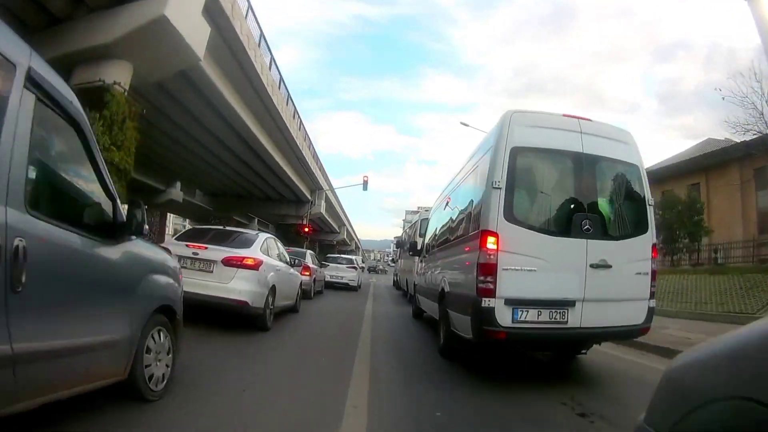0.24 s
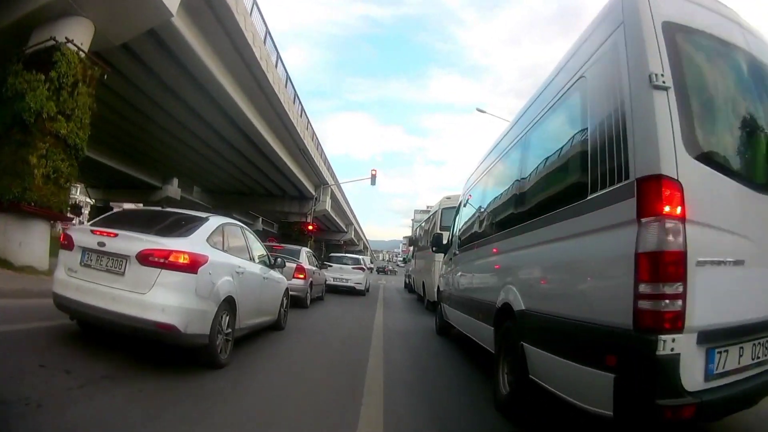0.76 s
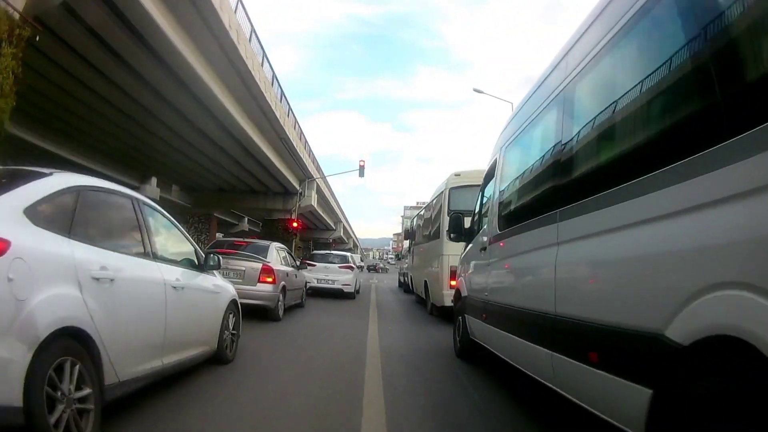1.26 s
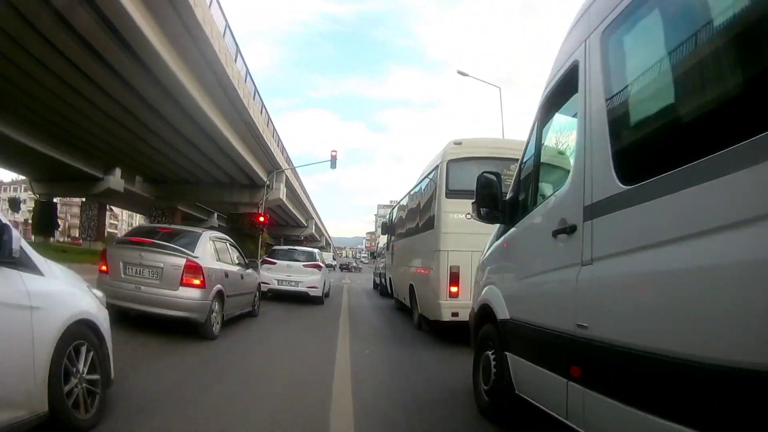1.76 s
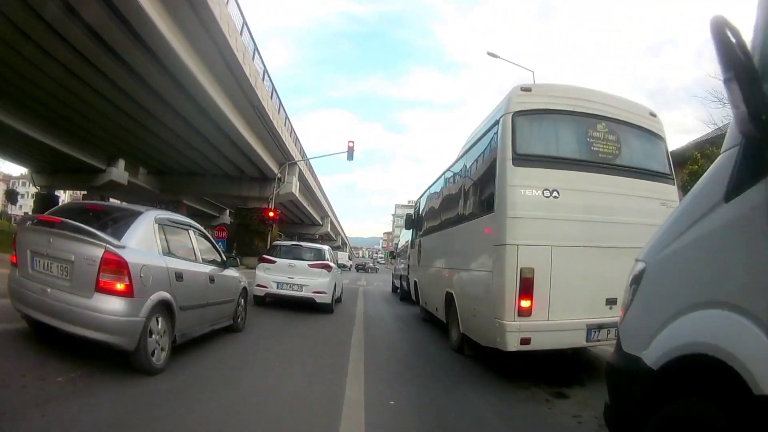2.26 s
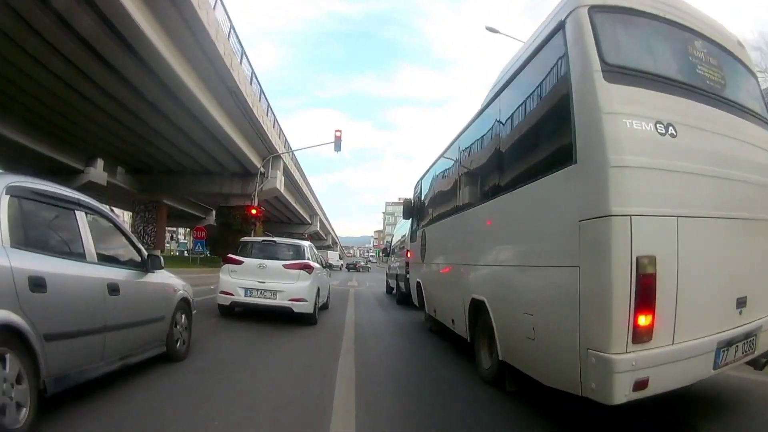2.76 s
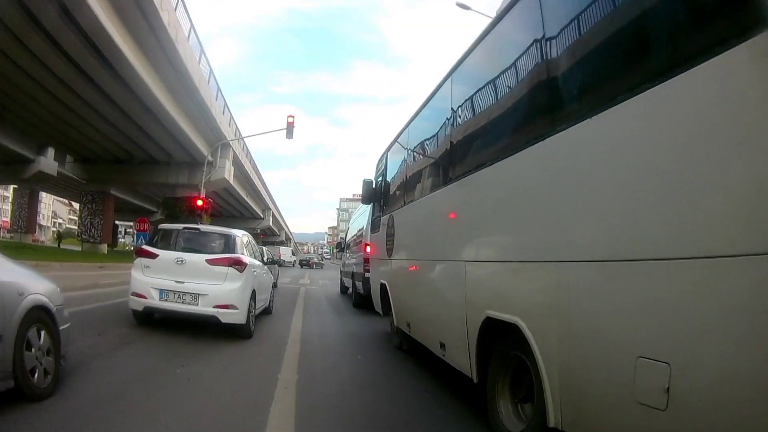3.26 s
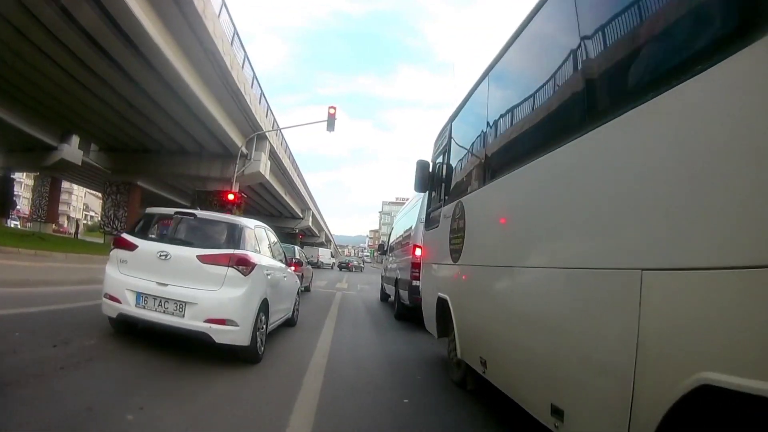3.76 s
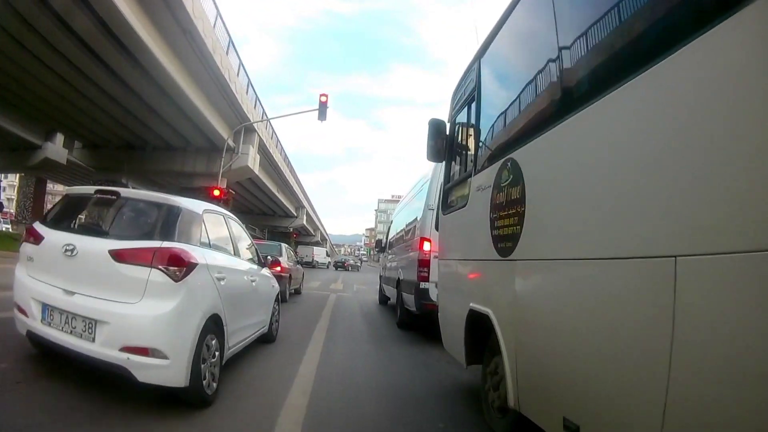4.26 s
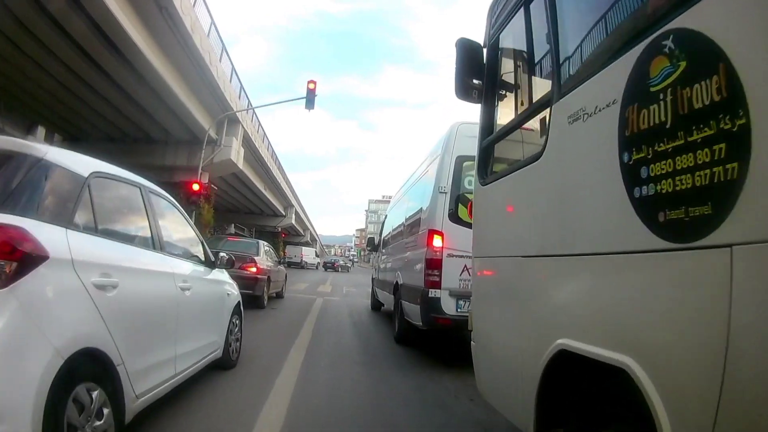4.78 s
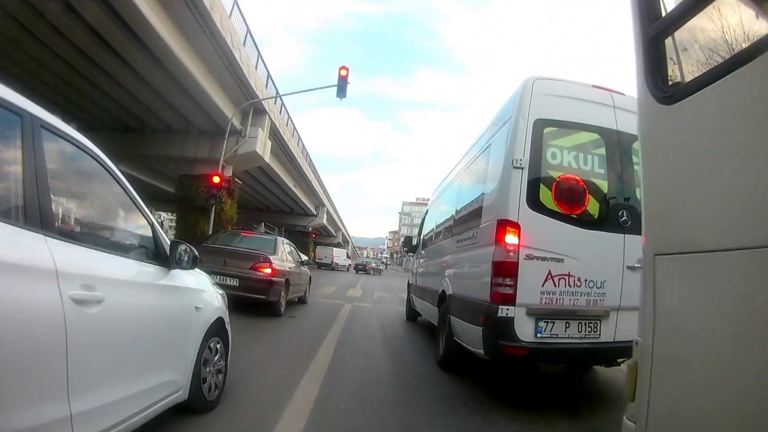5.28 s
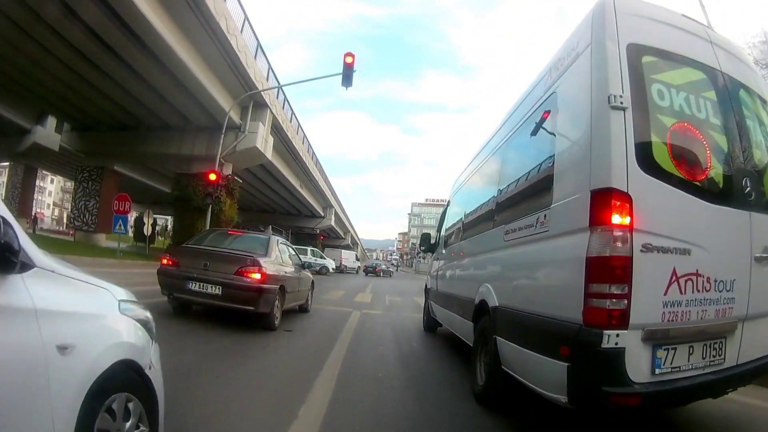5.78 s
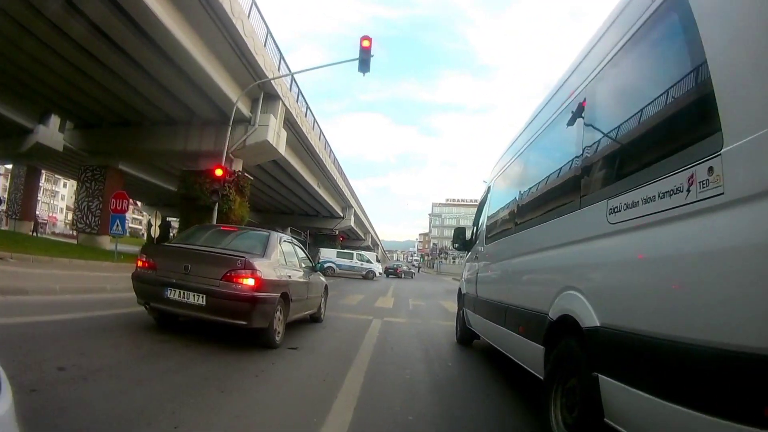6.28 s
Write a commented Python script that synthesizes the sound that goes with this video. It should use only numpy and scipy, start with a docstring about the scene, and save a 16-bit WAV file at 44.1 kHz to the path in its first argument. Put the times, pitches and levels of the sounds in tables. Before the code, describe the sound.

A cased camera microphone on a bicycle hears mostly vibration: a steady tyre hum falling by about an octave, road grain droning and the frame booming. One sharp plastic clack dominates the first second, then brief hoarse brake rubs dip the hum, followed by a dull thump and scattered small ticks. Outdoors around it, idling traffic roars dully and fades as the ride slows.

```python
"""The tyre tread of a bicycle hums lower as the bicycle slows between two queues of idling cars and vans.
It is heard from a cased camera on the handlebar: the hum is a tone at the rate of the tread blocks, and
road grain drones through the resonances of the mount and handlebar. Blows make the case knock, rattle
and tick by ringing its modes; the brake pads rub in short swells of resonant noise. Behind them are
shaped noises: air round the case, the growl of close cars, and a dull roar of traffic with diesel clatter."""
import sys
import numpy as np
from scipy import signal
from scipy.fft import rfft, irfft, next_fast_len
from scipy.io import wavfile
from scipy.ndimage import uniform_filter1d

SR = 44100
rng = np.random.default_rng(int(sys.argv[2]) if len(sys.argv) > 2 else 0)


def generate_wav(sig):
    """Save sig (samples, or channels by samples) to the path in sys.argv[1] as 16-bit PCM at SR."""
    pcm = np.round(np.clip(np.atleast_2d(sig).T, -1, 1) * 32767).astype(np.int16)
    wavfile.write(sys.argv[1], SR, pcm)


N = 287973
HIT_SIZE = 4096  # length of one blow [samples]

# tread blocks meeting the road, in step with the speed: (time [s], block rate [Hz])
TREAD_RATE = [(0, 131.5), (.9, 127.1), (1.35, 123.5), (1.8, 117.5), (2.35, 108.1), (2.72, 97.43),
              (3.13, 92.34), (3.6, 81.34), (4.0, 76.53), (4.45, 73), (5.6, 69.7), (6.53, 64.2)]


def undb(db):
    """Amplitude ratio of a level in decibels."""
    return 10 ** (np.asarray(db) / 20)


def curve(table):
    """Linear interpolation in time of rows (time [s], value)."""
    rows = np.array(table)
    return np.interp(np.arange(N) / SR, rows[:, 0], rows[:, 1])


def swells(table):
    """Sum of Gaussian pulses (middle [s], length [s], height); height times length is the area of each."""
    t = np.arange(N) / SR
    return sum(height * np.exp(-np.pi * ((t - s) / length_s) ** 2) for s, length_s, height in table)


def unit(x):
    """Normalise the mean power to 1."""
    return x / np.sqrt(np.mean(x ** 2))


def peak(x, db):
    """Normalise the largest excursion to a peak level [dB]."""
    return x * undb(db) / np.abs(x).max()


def steady(x, window_s):
    """Gain control: division by the running rms evens out slow swells and leaves quick flutter."""
    return x / np.sqrt(uniform_filter1d(x * x, int(window_s * SR)) + 1e-18)


def walk(rate):
    """Low-pass random modulation: steps drawn about rate times a second, smoothed twice, rms 1."""
    k = int(SR / rate)
    steps = rng.standard_normal(N)[np.arange(N) // k]
    smoother = uniform_filter1d(steps, k, mode="constant")
    return unit(uniform_filter1d(smoother, k, mode="constant"))


def turns(hz):
    """Phase [rad] as the time integral of a moving frequency."""
    return 2 * np.pi * np.cumsum(hz) / SR


def wavering(phase, rate, spread):
    """Random quadrature modulation: spread 0 is a pure tone, 1 a narrow band of noise."""
    noise = walk(rate) * np.sin(phase) + walk(rate) * np.cos(phase)
    return unit((1 - spread) * np.sin(phase) + spread * noise)


def ring(x, modes, order=1):
    """Parallel resonators (centre [Hz], width [Hz], gain [dB]); order 2 steepens their skirts."""
    f = np.fft.rfftfreq(len(x), 1 / SR) + 1e-6  # keeps clear of division by zero
    response = 0
    for hz, width, db in modes:
        detuning = (f * f - hz * hz) / (f * width)
        response = response + undb(db) / (1 + 1j * detuning) ** order
    return irfft(rfft(x) * response, len(x))


def shaken(modes):
    """Random vibration: each resonance is kept ringing by its own white noise; the sum has rms 1."""
    size = next_fast_len(N, real=True)
    return unit(sum(ring(rng.standard_normal(size), [mode], order=2) for mode in modes)[:N])


def band(x, lo_hz, hi_hz, order=2):
    """Butterworth band-pass filter."""
    return signal.sosfilt(signal.butter(order, [lo_hz, hi_hz], "band", fs=SR, output="sos"), x)


def colour(x, points):
    """Spectral shaping by (frequency [Hz], gain [dB]) points, joined on a logarithmic frequency axis."""
    hz, db = np.transpose(points)
    f = np.fft.rfftfreq(len(x), 1 / SR) + 1
    return irfft(rfft(x) * undb(np.interp(np.log(f), np.log(hz), db)), len(x))


def tyre(phase):
    """Periodic impact: tread blocks hum at their rate, slap more separately when slow, and dip at brake rubs."""
    # hum level before wavering and braking: (time [s], level [dB])
    hum_level = [(0, -45.5), (.55, -47), (.95, -53), (1.08, -40.5), (1.75, -46), (2.05, -47), (2.45, -42),
                 (3.6, -48), (4.3, -45), (5.55, -49.5), (6.53, -47)]
    tone = np.sin(phase) * (1 + 0.12 * walk(23))
    # the octave gains 4 dB each time the block rate halves
    octave_db = -16.5 - 4 * np.log2(curve(TREAD_RATE) / 75)
    octave = undb(octave_db) * (1 + 0.25 * walk(16)) * np.sin(2 * phase + .3 * walk(20))
    rub = rubbing()
    duck = 1 - 0.87 * rub / rub.max()  # the hardest rub takes 87 % of the hum
    waver_db = 1.7 * walk(11)
    return unit(tone + octave) * duck * undb(curve(hum_level) + waver_db)


def shaking_db():
    """Forced vibration: level [dB] of the shaking by asphalt grain, raised in short swells."""
    # shaking by the grain of the asphalt: (time [s], level [dB])
    grain_level = [(0.0, -41), (1.54, -36), (1.78, -34), (2.11, -36.5), (2.78, -42), (3.71, -45.5),
                   (4.71, -47.5), (5.31, -45), (6.53, -46.5)]
    # short swells of the drone, from coarse asphalt or ringing on after a knock:
    # (middle [s], length [s], extra shaking [dB])
    drone_swells = [(.49, 0.08, 3.5), (.68, .09, 5.5), (.75, .05, 3.5), (1.94, 0.083, 6.5),
                    (2.07, 0.033, 4.5), (2.21, .14, 5), (2.44, 0.062, 6.5), (3.43, .12, 6.5),
                    (3.8, 0.13, 4.5), (4.07, 0.11, 6.5), (4.35, 0.082, 7), (5.11, .1, 3), (5.29, 0.03, 6.5),
                    (5.89, 0.032, 8)]
    return curve(grain_level) + swells(drone_swells)


def road(phase):
    """Resonance: grain rings the mount, joined by the tread's third harmonic as it slides through."""
    # resonances of the mount: (centre [Hz], width [Hz], gain [dB])
    mount_modes = [(327.4, 26, -1), (344.7, 26, 2.5), (388.5, 52, -7.5), (435.2, 49, -14.5)]
    # where the third harmonic rings the mount: (centre [Hz], width [Hz], level over the grain [dB])
    third_modes = [(333.5, 38, 1.5), (388, 22, -4)]
    grain = shaken(mount_modes)
    third_hz = 3 * curve(TREAD_RATE)
    nearness = sum(undb(db) * np.exp(-((third_hz - hz) / width) ** 2) for hz, width, db in third_modes)
    third = nearness * wavering(3 * phase, rate=44, spread=.68)
    return steady(grain + third, window_s=.09) * undb(shaking_db() + 0.68)


def frame(phase):
    """Resonance: tread overtones and grain boom in the handlebar; the frame bounces on the air in the tyres."""
    # tread overtones that boom: (multiple of the block rate [1], level at resonance [dB])
    overtones = [(1.679, -44), (2.0, -47), (3.0, -49.5), (3.3, -51)]
    # bounce of the frame, before a trim of -0.94 dB: (time [s], level [dB])
    bounce_level = [(0, -53), (.9, -46.5), (1.25, -42.5), (2.5, -40.5), (2.95, -46.5), (3.7, -43),
                    (4.9, -50.5), (6.05, -52), (6.3, -45), (6.53, -51)]
    boom_hz, boom_width_hz = 237, 24
    block_hz = curve(TREAD_RATE)
    grain_db = shaking_db() - 14.5  # the handlebar's share of the road grain
    boom = shaken([(boom_hz, boom_width_hz, 0)]) * undb(grain_db)
    for multiple, db in overtones:
        nearness = np.exp(-((multiple * block_hz - boom_hz) / boom_width_hz) ** 2)
        tone = steady(wavering(multiple * phase, rate=30, spread=.58), window_s=.15)
        boom = boom + undb(db) * nearness * tone
    bounce = steady(shaken([(42, 11, 0)]), window_s=.17)
    return boom + bounce * undb(curve(bounce_level) - 0.94)


def rubbing():
    """Contact strength: the amplitude of friction swells each time the brake pads touch the wheel."""
    # touches of the brake pads: (middle [s], length [s], level [dB])
    pad_touches = [(1.973, 0.28, -55), (2.255, 0.082, -49.5), (2.462, 0.077, -50.5), (2.657, 0.2, -56.5),
                   (2.941, 0.15, -58.5), (3.2, 0.11, -53), (3.682, 0.15, -57.5), (5.784, 0.1, -64)]
    return swells([(s, length_s, undb(db)) for s, length_s, db in pad_touches])


def brake():
    """Friction noise: random scraping excites the resonances of the brake, with a quick flutter."""
    # resonances of the rubbing brake: (centre [Hz], width [Hz], gain [dB])
    pad_modes = [(1064, 260, 7), (1750, 320, -13), (2160, 170, -15.5), (3015, 700, -16.5),
                 (3660, 100, -17.5), (4306, 89, -21.5)]
    flutter_db = 2.65 * walk(120)
    return shaken(pad_modes) * rubbing() * undb(flutter_db)


def contact(chatter_s):
    """Impulsive excitation: a push, then exponentially decaying chatter between the touching parts."""
    t = np.arange(HIT_SIZE) / SR
    push = 0.79 * rng.standard_normal(HIT_SIZE) * np.exp(-t / chatter_s)
    push[0] += 1
    return push


def blow(chatter_s, treble_db, thud_db, top_hz):
    """Modal response: a softer contact loses treble, a heavier one reaches the low modes of the case."""
    # modes of the camera case: (centre [Hz], width [Hz], level [dB])
    case_modes = [(440, 120, -9), (740, 250, -5), (1150, 260, -2.5), (1475, 190, -0.5), (1840, 270, -2.5),
                  (2195, 250, -4), (2760, 290, -12), (3098, 280, -9.5), (3630, 300, -13.5),
                  (4450, 190, -13), (5650, 1200, -14.5), (7150, 580, -25.5)]
    sound = 0
    for hz, width, db in case_modes:
        treble = treble_db * max(np.log2(hz / 1500), 0)  # dB per octave above 1500 Hz
        thud = thud_db * max(np.log(1150 / hz), 0)  # dB per factor e below 1150 Hz
        mode = unit(ring(contact(chatter_s), [(hz, width, 0)], order=2))
        sound = sound + undb(db + treble + thud) * mode
    return signal.sosfilt(signal.butter(7, top_hz, fs=SR, output="sos"), sound)


def add(out, s, x):
    """Superposition: mix x into out at time s [s]."""
    i = int(s * SR)
    out[i:i + len(x)] += x[:N - i]


def knocks():
    """Impact: hard clacks are brighter, bumps dull, ticks thin; jolts add a damped thump of the mount."""
    # clacks of the case in its mount:
    # (time [s], peak [dB], treble slope [dB per octave], chatter decay [s])
    clacks = [(0.6643, -19, -15.5, 0.0039), (0.6769, -12.5, -9, 0.0017), (0.6912, -18.5, -5, 0.0034),
              (0.7281, -3.5, 2.26, 0.0011), (0.742, -31, -5.5, 0.0033), (0.8043, -32, -7.5, 0.0014),
              (0.8242, -22.5, -8, 0.0011), (0.8605, -20.5, -5, 0.0018), (0.8949, -29.5, -6.5, 0.0013),
              (1.4485, -37, -12, 0.0016), (3.773, -43.5, -12, 0.0015), (3.987, -43, -23, 0.0013),
              (4.0123, -30.5, -26, 0.0031), (4.0396, -21.5, -19.5, 0.002)]
    # knocks from bumps in the road: (time [s], peak [dB], thud slope [dB per factor e in frequency])
    bump_knocks = [(0.3285, -30.5, 8), (0.3373, -32.5, 8), (0.955, -37, 17), (0.9998, -41, 3),
                   (1.0205, -30.5, 14.5), (1.3759, -28, 22), (1.7614, -27, 14.5), (4.0365, -22, 6),
                   (4.0544, -47.5, 10), (4.0913, -35, 10.5), (4.7052, -34, 12), (4.7197, -37.5, 4.5),
                   (5.0364, -44, 5), (5.3094, -42, 0.5), (5.8515, -56, 11), (6.4522, -36.5, 14.5),
                   (6.4725, -33.5, 4)]
    # the front wheel drops over a seam: (time [s], peak [dB])
    seam_jolts = [(0.664, -34.5), (4.0401, -18.5)]
    # light ticks of the running gear: (time [s], peak [dB])
    gear_ticks = [(1.822, -49.5), (3.0092, -58.5), (3.1108, -61.5), (4.133, -50.5), (4.348, -56),
                  (4.5344, -53), (4.88, -62.5), (5.09, -54), (5.7612, -54.5), (6.0668, -56.5)]
    out, t = np.zeros(N), np.arange(HIT_SIZE) / SR
    for s, db, treble_db, chatter_s in clacks:
        clack = blow(chatter_s, treble_db, thud_db=-7.5, top_hz=7800)
        add(out, s, peak(clack, db))
    for s, db, thud_db in bump_knocks:
        knock = blow(chatter_s=0.0046, treble_db=-26, thud_db=thud_db, top_hz=4080)
        add(out, s, peak(knock, db))
    for s, db in seam_jolts:
        envelope = (1 - np.exp(-t / 0.00067)) * np.exp(-t / 0.0036)
        add(out, s, peak(np.sin(2 * np.pi * 440 * t) * envelope, db))
    for s, db in gear_ticks:
        tick = blow(chatter_s=0.0061, treble_db=-0.5, thud_db=-2.5, top_hz=5270)
        add(out, s, peak(band(tick, 1600, 8000, order=3), db))
    return out


def wind():
    """Flow noise: air rushes round the case with an amplitude in proportion to the speed."""
    # colour of the air streaming past the case: (frequency [Hz], density [dB per Hz])
    rush_colour = [(20, -7.5), (60, -4.5), (100, 0.5), (160, 0.5), (210, 4.5), (285, 3), (400, 0.5),
                   (480, 0), (560, -14.5), (900, -34), (3000, -76.5)]
    speed_db = 20 * np.log10(curve(TREAD_RATE) / 100)
    gust_db = 1.3 * walk(9)
    rush = unit(colour(rng.standard_normal(N), rush_colour))
    return rush * undb(-49.5 + speed_db + gust_db)


def near_cars():
    """Inverse-square law: fans and engines growl through the wheel arches of close cars, fading with distance."""
    # vehicles passed at arm's length: (time abreast [s], level abreast [dB])
    passes = [(.22, -53), (.85, -48.5), (1.7, -54), (2.05, -58.5), (3.45, -62.5), (6.45, -63.5)]
    pass_s = 0.14  # time to ride as far as the gap to those cars
    t = np.arange(N) / SR
    power = sum(undb(db) ** 2 / (1 + ((t - s) / pass_s) ** 2) for s, db in passes)
    growl = shaken([(742.4, 120, 1.5), (820, 300, -3.0), (1020, 97, -5.5)])
    return growl * np.sqrt(power) * undb(walk(60))


def traffic():
    """Noise modulation: engines and tyres roar dully; the nearest diesels clatter once per firing."""
    # colour of the roar through the case: (frequency [Hz], density [dB per Hz])
    roar_colour = [(300, -17), (500, -5.5), (620, -6), (760, 2), (900, -3), (1100, -1.5), (1280, -9),
                   (1500, -7), (1750, -13.5), (2100, -24.5), (3000, -41), (5000, -77)]
    # colour of the engine clatter through the case: (frequency [Hz], density [dB per Hz])
    clatter_colour = [(900, -33), (1800, 2.5), (2030, -4), (2250, 5.5), (2550, -15), (2780, -2.5),
                      (3000, -11), (3200, -3.5), (3650, -10.5), (4100, -12), (4550, -14), (4950, -22.5),
                      (6400, -26.5), (8000, -40), (12000, -63)]
    t = np.arange(N) / SR
    firing = np.cumsum(27 * (1 + 0.078 * walk(1))) / SR % 1  # place in the cycle, about 27 firings a second
    knock = 1 + 1.7 * np.exp(-firing / 0.27)
    flutter, swell = walk(45), walk(7)
    roar_noise = rng.standard_normal(N) * undb(1.4 * flutter)
    roar = unit(colour(roar_noise, roar_colour))
    clatter_noise = rng.standard_normal(N) * knock * undb(1.3 * flutter + 1.5 * walk(210))
    clatter = unit(colour(clatter_noise, clatter_colour))
    # both fall steadily [dB per s] as the queue thins out towards the junction
    roar_db = -53.5 - 1.0 * t + .3 * swell
    clatter_db = -70 - 0.28 * t + 0.53 * swell
    return roar * undb(roar_db) + clatter * undb(clatter_db)


def scene():
    """Superposition of bicycle and street at the handlebar; one phase locks all tread harmonics."""
    phase = turns(curve(TREAD_RATE))
    bicycle = tyre(phase) + road(phase) + frame(phase) + brake() + knocks()
    street = wind() + near_cars() + traffic()
    fade_in = np.minimum(np.arange(N) / 200, 1)
    return (fade_in * (bicycle + street))[None]


def record(dry):
    """Saturation and band limit: the microphone flattens the hardest clack, hisses and loses the very top."""
    ceiling = undb(-10.2)
    held = dry / (1 + (dry / ceiling) ** 6) ** (1 / 6)
    hiss = undb(-89.0) * rng.standard_normal(dry.shape)
    low_pass = signal.ellip(8, .2, 70, 15600, fs=SR, output="sos")  # ripple and stop band [dB], edge [Hz]
    return signal.sosfilt(low_pass, held + hiss)


dry = scene()
out = record(dry)
generate_wav(out)
```